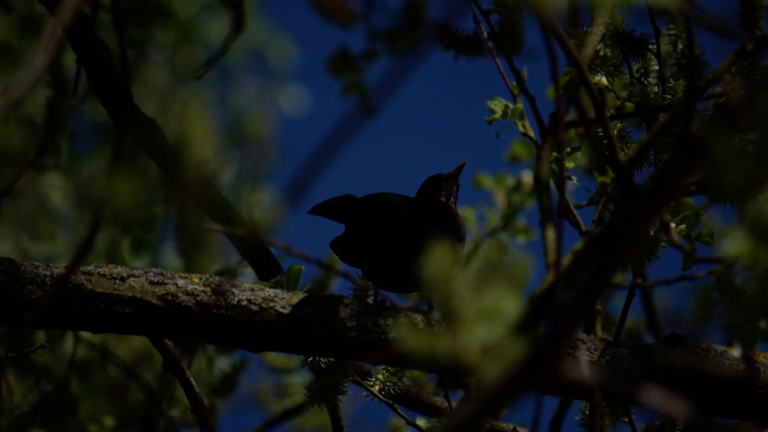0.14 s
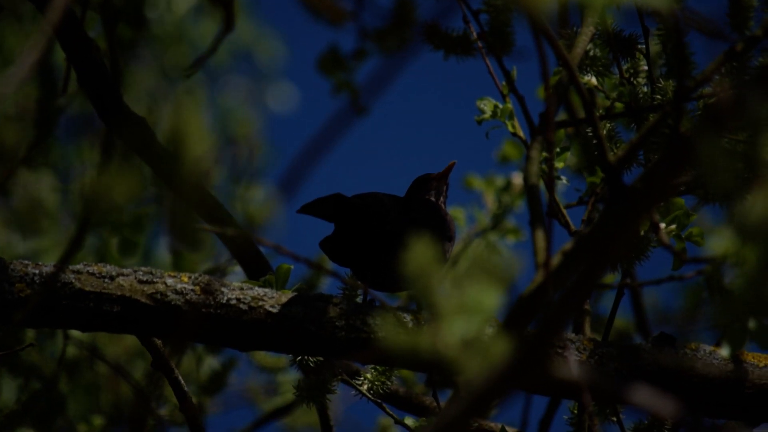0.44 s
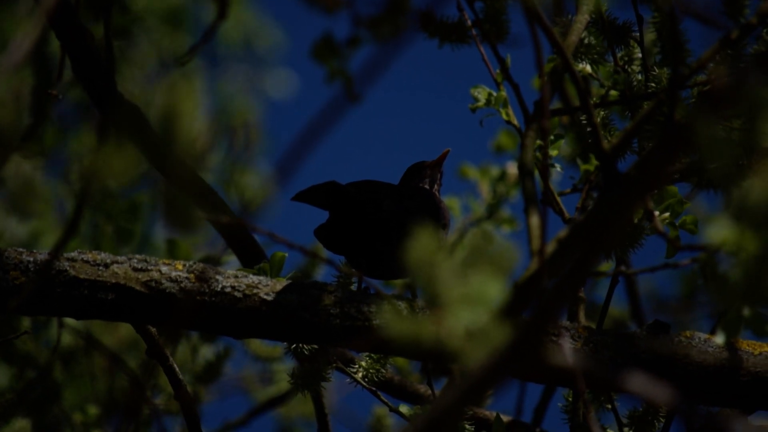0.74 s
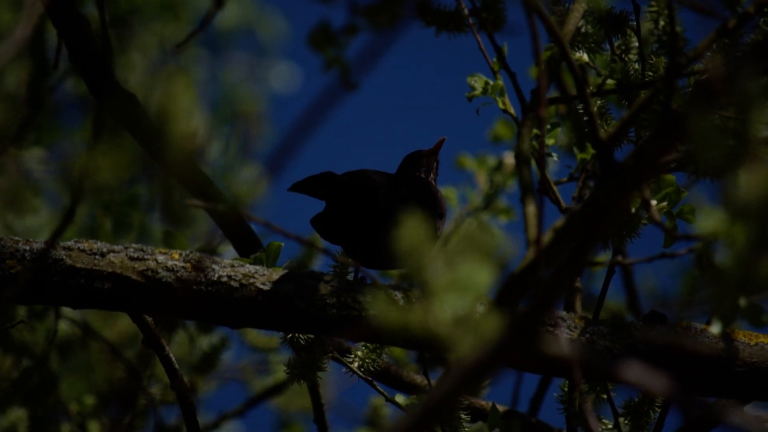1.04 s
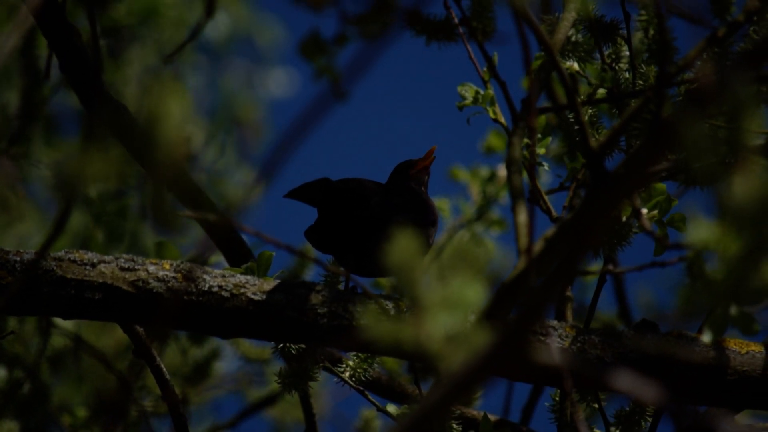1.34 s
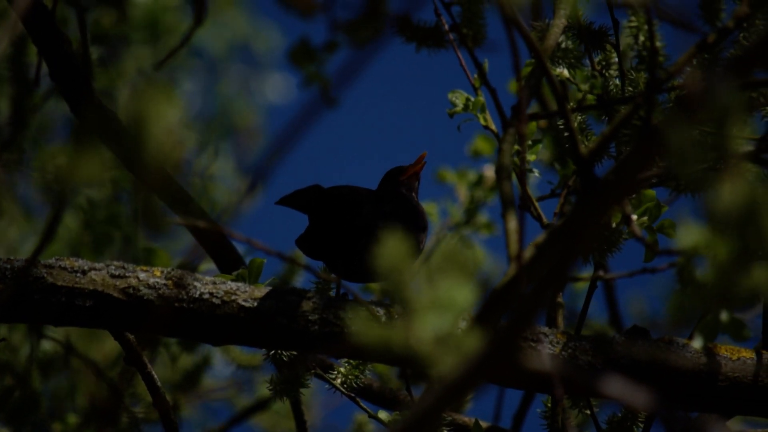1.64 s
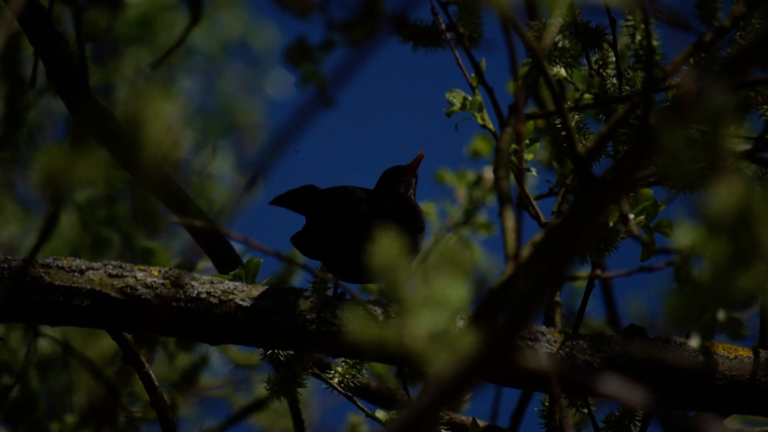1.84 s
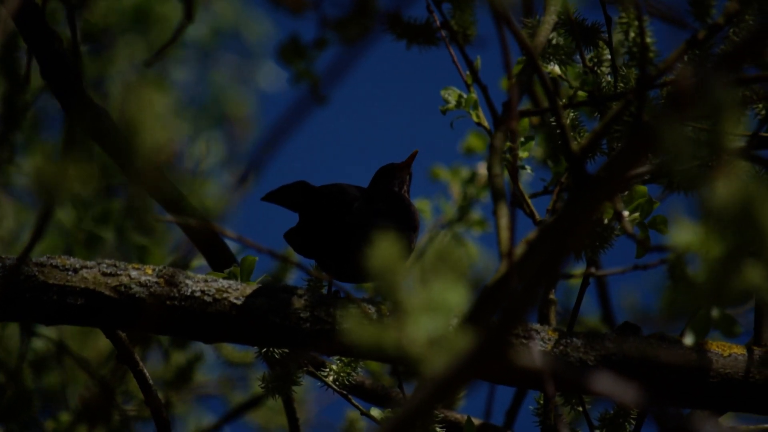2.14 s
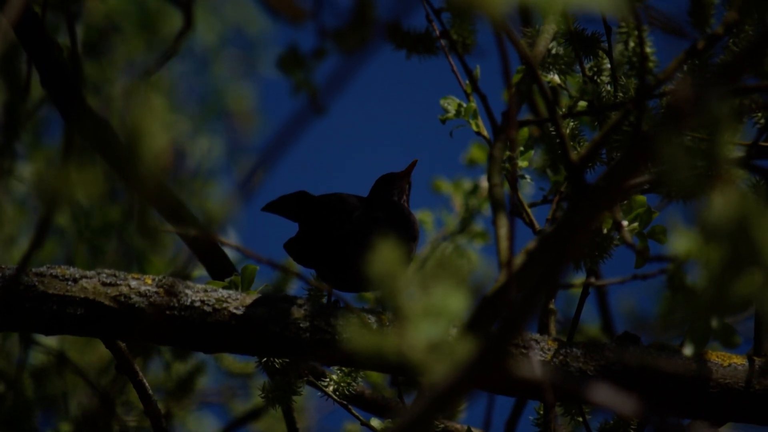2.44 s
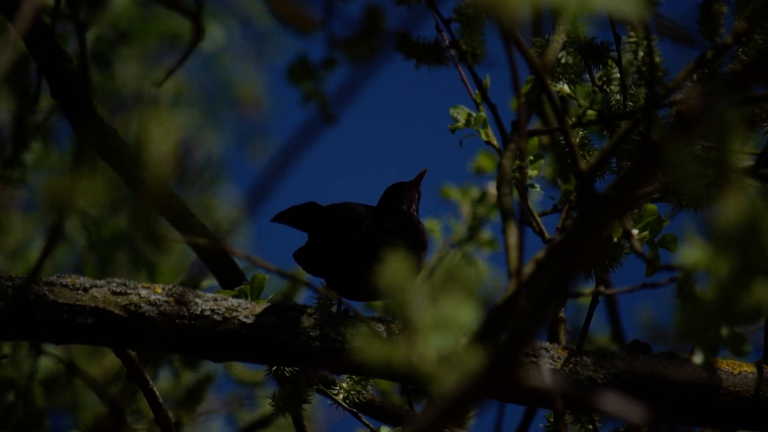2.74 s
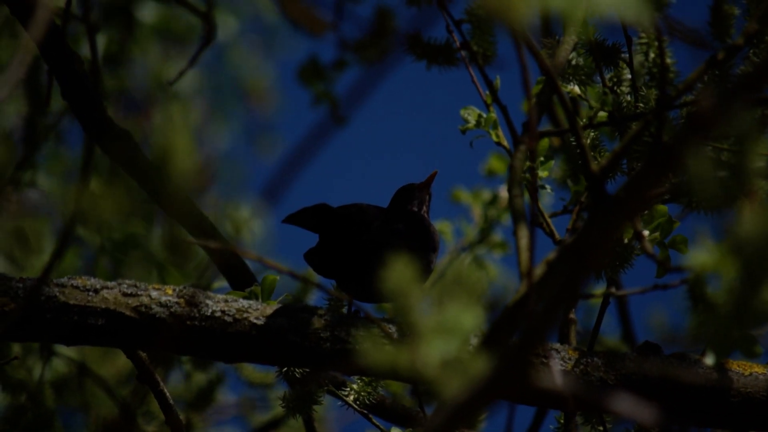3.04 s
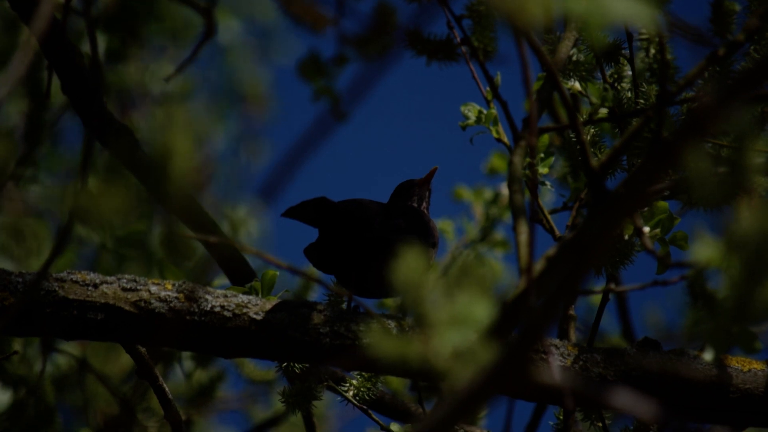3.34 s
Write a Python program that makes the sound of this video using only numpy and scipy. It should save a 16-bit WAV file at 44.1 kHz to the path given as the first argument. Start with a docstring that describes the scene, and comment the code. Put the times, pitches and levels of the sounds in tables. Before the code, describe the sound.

A blackbird gives one thin, high, falling whistle over gusty wind and faint distant chirps.

```python
"""From the start, gusts buffet two microphone ports, one small swirl of air (an eddy) at a time.
Other birds chirp and warble faintly over a soft hiss and a far roar like traffic.
At about 1.3 seconds a blackbird in a tree gives one thin, falling alarm whistle.
As it ends, a rush like far tyres swells, then fades. A high, buzzy trill follows at 2.5 seconds,
and the wind and the far birds carry on to the end."""
import sys
import numpy as np
from scipy import signal
from scipy.fft import rfft, irfft, next_fast_len
from scipy.io import wavfile
from scipy.ndimage import uniform_filter1d

SR = 44100
rng = np.random.default_rng(int(sys.argv[2]) if len(sys.argv) > 2 else 0)


def pcm_store(signal):
    """Save signal as 16-bit PCM."""
    levels = np.round(np.clip(np.atleast_2d(signal), -1, 1) * 32767)
    wavfile.write(sys.argv[1], SR, levels.astype(np.int16).T)


N = 153909
T = np.arange(N) / SR

# The whistle's falling pitch. Each row: time in seconds, pitch in Hz.
WHISTLE_PITCH = [(1.274, 9600), (1.29, 9450), (1.305, 9200), (1.345, 9140), (1.44, 8820), (1.51, 8650),
                 (1.59, 8470), (1.615, 8290), (1.655, 8320), (1.70, 8180), (1.75, 8080), (1.79, 7960),
                 (1.82, 7900)]
# How the whistle swells and fades. Each row: time in seconds, level in dB.
WHISTLE_LEVEL = [(1.277, -61), (1.299, -52.5), (1.339, -49), (1.371, -34.5), (1.387, -42), (1.407, -32),
                 (1.439, -39), (1.499, -29.5), (1.527, -36), (1.543, -29.5), (1.563, -37.5), (1.689, -44.5),
                 (1.741, -43), (1.79, -50.5), (1.825, -64)]
# Echoes off near branches and a farther trunk. Each row: delay in seconds, left and right gain in dB.
BRANCH_ECHOES = [(.0047, -31, -22), (0.013, -17.5, -32), (.052, -20.5, -23.5), (.13, -31.5, -31)]
# The wind's strength at each port. Each row: time in seconds, left and right level in dB.
WIND_STRENGTH = [(0.0, -23, -25.5), (0.06, -29.5, -29), (0.16, -38, -30.5), (0.28, -33, -32.0),
                 (0.37, -34.5, -29.5), (0.45, -43.5, -40), (0.53, -41, -45), (0.66, -50.5, -42),
                 (0.75, -40, -34.5), (0.86, -42.0, -36.5), (0.92, -40.5, -38), (1.12, -46, -43),
                 (1.22, -32, -30.5), (1.3, -36, -33), (1.38, -31, -29), (1.55, -43.5, -29),
                 (1.66, -46.5, -41.5), (1.75, -49, -43), (1.83, -39, -35.5), (1.93, -52, -38.5),
                 (2.01, -26, -31.5), (2.08, -48, -37.5), (2.14, -33, -29.5), (2.21, -51.5, -50),
                 (2.34, -44.5, -28.5), (2.46, -43.5, -43.5), (2.53, -28.5, -30.5), (2.59, -38.5, -34),
                 (2.66, -27, -27.5), (2.79, -40, -34), (2.86, -41.0, -37), (2.97, -31.5, -29.5),
                 (3.08, -43, -34.5), (3.2, -45.5, -36.5), (3.3, -41, -36.5), (3.49, -44.5, -38.5)]
# Single eddies that stand out as soft knocks or short flutters. Each row: time in seconds,
# port (0 left, 1 right), level in dB, pitch in Hz, how long it swings in radians.
BUFFETS = [(0.005,1,-18.5,255,3), (0.013,0,-17.5,406,4.5), (0.068,1,-15,328,3.9), (0.089,1,-18,190,0.91),
           (0.137,1,-18.5,161,3.2), (0.202,1,-19.5,187,2.6), (0.214,1,-19,260,2.5),
           (0.277,0,-14.5,150,0.82), (0.289,1,-18.5,177,2), (0.324,1,-13,249,1.9), (0.337,1,-24.5,210,8.9),
           (0.352,1,-19.5,280,1.7), (0.392,1,-8.5,324,1.19), (0.463,1,-19,250,1.34), (0.471,1,-19,206,1.53),
           (0.564,0,-27.5,247,1.7), (0.638,1,-22,222,1.13), (0.741,1,-21.5,378,1.6), (0.815,1,-22,364,1.3),
           (0.843,1,-29,230,2), (0.889,1,-22,222,1.15), (0.976,1,-24,214,2), (1.062,1,-24.5,170,1),
           (1.165,1,-20,259,1.9), (1.205,0,-19.5,150,1.3), (1.243,1,-26,445,2), (1.26,1,-17,422,2.7),
           (1.323,1,-18.5,178,2.3), (1.353,1,-14.5,310,1.2), (1.368,1,-14.5,242,2.2),
           (1.373,0,-17.5,188,2.1), (1.433,1,-16,288,2), (1.452,1,-12,189,0.72), (1.485,1,-24,250,2.8),
           (1.537,1,-16.5,230,4.2), (1.542,0,-11.5,200,0.77), (1.616,1,-20,197,3.2),
           (1.624,0,-22.5,253,2.5), (1.695,1,-23.5,240,2.1), (1.841,1,-22,201,1), (1.869,0,-20.5,160,1.4),
           (1.977,0,-19,210,2.4), (1.993,1,-12,594,2.2), (1.998,0,-22,253,3.2), (2.008,1,-15.5,400,1.5),
           (2.034,1,-20.5,444,1.9), (2.074,1,-22.5,317,1.5), (2.102,1,-16,231,1.64), (2.137,1,-16,170,1),
           (2.146,1,-15.5,220,1.1), (2.284,1,-20.5,240,1.56), (2.325,1,-8.5,280,0.8), (2.335,0,-17,350,3.6),
           (2.349,1,-17,300,1.6), (2.361,1,-20,480,2.5), (2.514,1,-16,272,2.9), (2.527,1,-16.5,383,3.1),
           (2.535,1,-22,450,1.7), (2.553,0,-24.5,400,1.3), (2.607,1,-20.5,440,1.9), (2.652,0,-21,310,9.7),
           (2.654,1,-13.5,343,7.1), (2.661,1,-20,200,5.2), (2.691,1,-15,396,3.1), (2.701,0,-16,189,1.1),
           (2.773,1,-16.5,257,1.9), (2.783,1,-15.5,179,2.6), (2.798,1,-14.5,270,1.4), (2.807,1,-21,188,3),
           (2.815,0,-8.5,206,0.76), (2.926,1,-20.5,383,3.3), (2.949,1,-20.5,240,3.5), (2.966,0,-15,145,2.6),
           (2.982,1,-17,235,3.3), (3.009,0,-17.5,220,1.6), (3.105,1,-17.5,180,2.2), (3.126,1,-19.5,260,1.8),
           (3.24,1,-23,189,1.9), (3.279,1,-17.5,161,2.3), (3.293,1,-19.5,266,2.4), (3.324,0,-21.5,190,2),
           (3.455,1,-22,170,1.1)]
# How long the small eddies swing, in radians: first the blunt kind, then the fluttering kind.
EDDY_SWINGS = [1.38, 2.13]
# Clean, rising chirps. Each row: start and length in seconds, first, middle and last pitch in Hz,
# level in dB.
CHIRPS = [(.025, 0.05, 3150, 3520, 3600, -58), (.166, 0.026, 3900, 4550, 5000, -59),
          (.51, 0.034, 2850, 3080, 3620, -60), (.592, 0.024, 3400, 4080, 4350, -55),
          (.642, 0.028, 2870, 3250, 3700, -58), (.775, 0.04, 3600, 4320, 4950, -66),
          (.905, 0.045, 3050, 3860, 4900, -61.5), (1.075, 0.058, 3060, 3900, 4780, -60.5),
          (1.22, 0.05, 3040, 3700, 4760, -59), (2.51, .04, 3550, 3950, 4500, -66),
          (2.61, 0.048, 5700, 6250, 6250, -55.5), (2.8, 0.047, 3500, 4050, 4530, -61),
          (2.89, 0.045, 3430, 3900, 4200, -65), (2.96, .055, 3550, 4180, 4700, -65),
          (3.105, 0.055, 3450, 4000, 4620, -62), (3.278, .052, 3550, 4220, 4600, -59.5)]
# Warbled notes, many of them small arches in pitch. Each row reads like a row of CHIRPS.
WARBLES = [(.124, 0.035, 2860, 3130, 3230, -54), (.152, 0.029, 2970, 3170, 2750, -52.5),
           (.198, 0.021, 5020, 4770, 4300, -58), (.222, 0.048, 3730, 3800, 4000, -54),
           (.252, 0.025, 4200, 4650, 4650, -60), (.278, 0.022, 4230, 3850, 3700, -57),
           (.306, 0.039, 2780, 3600, 3150, -53), (.338, 0.021, 3050, 2670, 2550, -56),
           (1.3, 0.091, 3700, 3910, 3030, -58.5), (2.218, 0.053, 4350, 4800, 4360, -61.5),
           (2.258, 0.025, 3510, 3700, 3750, -56), (2.284, 0.035, 3470, 3910, 3700, -54),
           (2.308, 0.047, 3560, 3700, 3430, -54), (2.312, 0.023, 4300, 4500, 4270, -56),
           (2.354, 0.031, 2980, 3450, 2750, -50), (2.385, .025, 3050, 2640, 2200, -65),
           (3.398, 0.045, 4380, 5000, 4350, -59), (3.432, .03, 3930, 3780, 3700, -53.5),
           (3.466, 0.024, 3670, 4000, 4900, -50.5)]
# The falling notes of a high, buzzy trill. Each row reads like a row of CHIRPS.
TRILL = [(2.52, 0.045, 8000, 7560, 7200, -68), (2.7, .06, 7700, 7400, 7100, -71),
         (2.78, 0.033, 7000, 6500, 5970, -62), (2.85, 0.03, 7200, 6600, 5900, -64),
         (2.9, .04, 7000, 6320, 5860, -65), (2.96, 0.035, 6700, 6350, 5800, -64)]
# Faint ticks, perhaps of twigs. Each row: start in seconds, pitch in Hz, level in dB.
TICKS = [(0.066, 2320, -39), (3.463, 1890, -34)]
# The tone colour of the roar, the brighter rush and the hiss.
# Each row: frequency in Hz, relative strength in dB.
ROAR_COLOUR = [(20, -54), (60, 3), (150, 0), (400, -9), (700, -3.5), (950, 1), (1150, -1.5), (1450, -6),
               (1900, -12.5), (2500, -25.5), (4000, -39.5), (8000, -68)]
RUSH_COLOUR = [(300, -49), (650, -22.5), (1000, 1.5), (1450, 2.5), (1800, -9.5), (2600, -32), (5000, -70)]
HISS_COLOUR = [(200, 0.5), (1500, 3.5), (2500, -0.5), (2800, 0), (3020, 3.5), (3300, -3.5), (3600, 3),
               (3900, -5), (4250, -3), (4900, -4), (5180, -1), (5450, -8.5), (7500, -11.5), (10000, -18),
               (14000, -22.5), (15500, -28)]
# How the roar and the rush rise and fall. Each row: time in seconds, level in dB.
ROAR_LEVEL = [(0, -44.5), (.9, -46.5), (1.4, -45.5), (1.95, -45), (2.5, -47), (3.49, -46.5)]
RUSH_LEVEL = [(0, -63), (1.3, -59.5), (1.75, -52), (2.2, -51.5), (2.7, -58.5), (3.49, -60)]


def blackbird(fade_s=.004, pitch_jitter=.001, tremble_db=1.6, leaf_shade_db=1, echo_db=-27):
    """One pure, falling tone with a slight tremble, bouncing off the branches."""
    hz = curve(WHISTLE_PITCH, T) * (1 + pitch_jitter * wander(250))
    start, end = WHISTLE_PITCH[0][0], WHISTLE_PITCH[-1][0] + fade_s
    fade = np.clip(np.minimum(T - start, end - T) / fade_s, 0, 1)
    level = amp(curve(WHISTLE_LEVEL, T) - 1 + tremble_db * wander(100))
    tone = np.sqrt(2) * fade * level * sine(hz)
    # Moving leaves shade each port differently; the right side is a little louder.
    leaves_db = leaf_shade_db * np.array([wander(34.8), wander(34.8)])
    out = tone * amp(leaves_db + [[-.4], [.4]]) + amp(echo_db) * tree_echo(tone)
    for delay, *sides_db in BRANCH_ECHOES:
        for port, db in zip(out, sides_db):
            add(port, delay, amp(db) * tone)
    return out


def wind():
    """Each port meets its own stream of small eddies, plus single ones that stand out."""
    out = np.array([eddy_stream(curve(WIND_STRENGTH, T, column)) for column in (1, 2)])
    for time, side, db, hz, radians in BUFFETS:
        swing = amp(db) * eddy(hz, radians)
        add(out[side], time - len(swing) / 2 / SR, swing)
    return port_low_cut(out)


def eddy_stream(strength_db, typical_per_s=230, typical_hz=222, spread_db=4, puff_db=2):
    """Eddies come in puffs; stronger wind makes them hit harder and swing faster."""
    per_s = typical_per_s * np.exp(.5 * wander(typical_per_s))
    hits = np.diff(np.floor(np.cumsum(per_s) / SR), prepend=0)
    pushes = hits * rng.choice([-1, 1], N) * amp(spread_db * np.clip(rng.standard_normal(N), -2, 2))
    octaves = .52 * np.clip(rng.standard_normal(N), -1.6, 1.8)
    octaves += .01 * (strength_db - np.mean(strength_db))
    # Each eddy gets one of 14 pitches and one of two shapes.
    pitches = np.geomspace(90, 620, 14)
    pitch_index = np.minimum(np.searchsorted(pitches, typical_hz * 2 ** octaves), len(pitches) - 1)
    shape_index = rng.integers(0, len(EDDY_SWINGS), N)
    flow = np.zeros(N)
    for k, hz in enumerate(pitches):
        for j, radians in enumerate(EDDY_SWINGS):
            chosen = pushes * (pitch_index == k) * (shape_index == j)
            flow += signal.oaconvolve(chosen, unit(eddy(hz, radians)) / np.sqrt(hz), "same")
    puffs = amp(puff_db * wander(27.6))
    return unit(flow * puffs) * amp(strength_db)


def eddy(hz, radians):
    """Pressure swings down, then up, as a swirl of air crosses a port; longer swings flutter."""
    phase = 2 * np.pi * hz * np.arange(-882, 883) / SR  # 20 ms either side of the middle
    swing = np.sin(phase) * np.exp(-(phase / radians) ** 2 / 2)
    return swing / swing.max()


def port_low_cut(sound, edge_hz=114.3, damping=.51):
    """The ports drop the deepest rumble, with a slight hump just above the edge."""
    size = next_fast_len(N + SR // 10)
    ratio = np.fft.rfftfreq(size, 1 / SR) / edge_hz
    gain = ratio ** 2 / np.hypot(1 - ratio ** 2, 2 * damping * ratio)
    return irfft(rfft(sound, size) * gain, size)[:, :N]


def far_bird(notes, roughness, echo_db):
    """Short, wavering slides in pitch, blurred by the trees they pass through."""
    song, waver = np.zeros(N), wander(470)
    for start, length, first_hz, middle_hz, last_hz, db in notes:
        progress = np.arange(0, 1, 1 / (length * SR))
        arch = np.polyfit([0, .5, 1], [first_hz, middle_hz, last_hz], 2)
        wobble = 1 + roughness * np.roll(waver, -round(start * SR))[:len(progress)]
        hz = np.polyval(arch, progress) * wobble
        swell = np.sqrt(np.sin(np.pi * progress) / 2)
        add(song, start, amp(db) * swell * sine(hz))
    return song + amp(echo_db) * tree_echo(song)


def ticks(decay_s=.0035, width_hz=330):
    """Small, dry ticks: each is a narrow band of noise that dies at once."""
    out, t = np.zeros(N), T[:SR // 10]
    for start, hz, db in TICKS:
        ring = wander(width_hz)[:len(t)] * np.sin(2 * np.pi * hz * t)
        add(out, start, amp(db) * ring * np.exp(-t / decay_s))
    return out


def tree_echo(sound, die_away_s=.45, build_up_s=.0055):
    """Leaves and trunks scatter a sound into a soft echo, different at each port."""
    t = T[:SR // 2]
    tail = rng.standard_normal((2, len(t))) * amp(-60 * t / die_away_s) * (1 - np.exp(-t / build_up_s))
    return signal.fftconvolve(sound[None], tail / np.linalg.norm(tail[0]), axes=1)[:, :N]


def background(hiss_db=-58, whine_hz=15708):
    """A far roar like traffic, a passing rush, a soft hiss and a very faint electrical whine."""
    roar = coloured_noise(ROAR_COLOUR, alike=.97) * amp(curve(ROAR_LEVEL, T))
    rush = coloured_noise(RUSH_COLOUR, alike=.97) * amp(curve(RUSH_LEVEL, T))
    hiss = coloured_noise(HISS_COLOUR, alike=.26) * amp(hiss_db)
    whine = amp([[-72], [-81]]) * np.sqrt(2) * np.sin(2 * np.pi * whine_hz * T)
    return roar + rush + hiss + whine * [[-1], [1]]  # the whine swings opposite ways left and right


def coloured_noise(colour, alike, patchy_db=1.8):
    """Noise with drifting louder and softer patches; alike=1 makes left and right the same."""
    hz = np.fft.rfftfreq(1024, 1 / SR)
    a, b, c, d, patches = rng.standard_normal((N // 256 + 5, len(hz), 5)).T
    patches = uniform_filter1d(patches, size=3, axis=0)  # smooth across frequency
    patches = unit(uniform_filter1d(patches, size=24, axis=1))  # and across time
    left = a + 1j * b
    right = alike * left + np.sqrt(1 - alike ** 2) * (c + 1j * d)
    colour_hz, colour_db = np.transpose(colour)
    db = np.interp(np.log(hz + 1), np.log(colour_hz), colour_db)[:, None] + patchy_db * patches
    _, noise = signal.istft(np.array([left, right]) * amp(db), nperseg=1024, noverlap=768)
    return unit(noise[:, :N])


def amp(db):
    """Turns decibels into a gain."""
    return 10 ** (np.asarray(db) / 20)


def unit(x):
    """Scales a signal to an average power of 1."""
    return x / np.sqrt(np.mean(x ** 2) + 1e-20)


def sine(hz):
    """A pure tone that follows a changing pitch."""
    return np.sin(2 * np.pi * np.cumsum(hz) / SR)


def curve(points, t, column=1):
    """Joins the points in one column of a table with straight lines."""
    table = np.array(points, float)
    return np.interp(t, table[:, 0], table[:, column])


def add(mix, start_s, sound):
    """Mixes a sound in at a given time."""
    part = mix[max(0, round(start_s * SR)):][:len(sound)]
    part += sound[:len(part)]


def wander(hz):
    """Smooth random motion, up to about the given rate."""
    size = next_fast_len(N)
    smoothing = np.exp(-(np.fft.rfftfreq(size, 1 / SR) / hz) ** 2)
    return unit(irfft(rfft(rng.standard_normal(size)) * smoothing, size)[:N])


def scene():
    """Mixes the blackbird, its neighbours, the ticks, the wind and the background."""
    chirps = far_bird(CHIRPS, roughness=.02, echo_db=-4)
    warbles = far_bird(WARBLES, roughness=.034, echo_db=-3)
    trill = far_bird(TRILL, roughness=.078, echo_db=-.5)
    return blackbird() + chirps + warbles + trill + ticks() + wind() + background()


def record(dry, cutoff_hz=15900):
    """Cuts away the very highest treble."""
    low_pass = signal.firwin(1023, cutoff_hz, window=("kaiser", 9), fs=SR)
    return signal.oaconvolve(dry, low_pass[None], "same", axes=1)


dry = scene()
out = record(dry)
pcm_store(out)
```